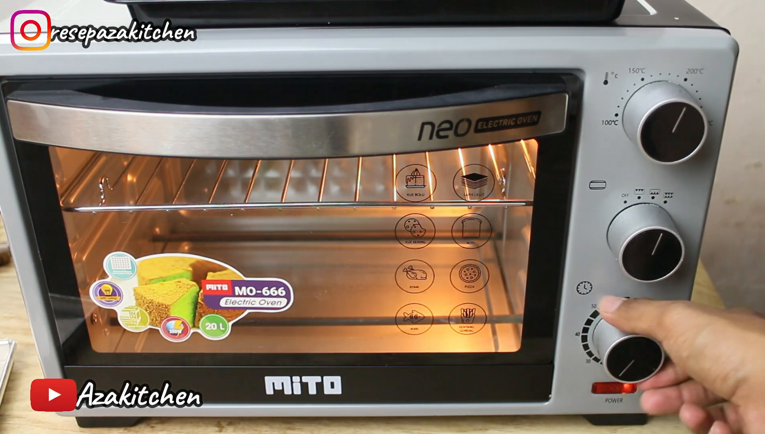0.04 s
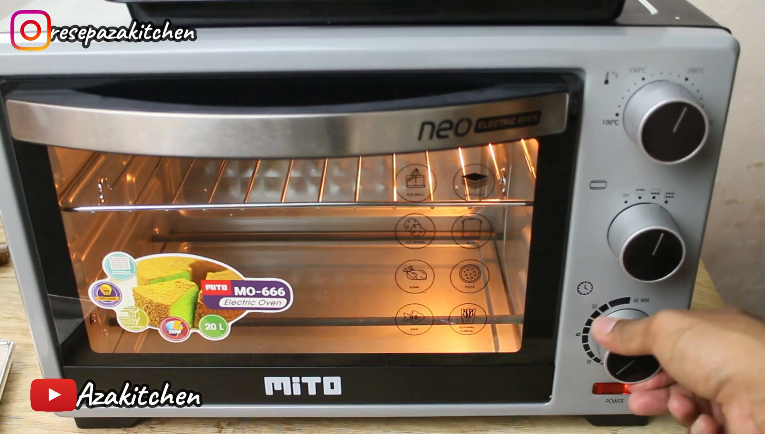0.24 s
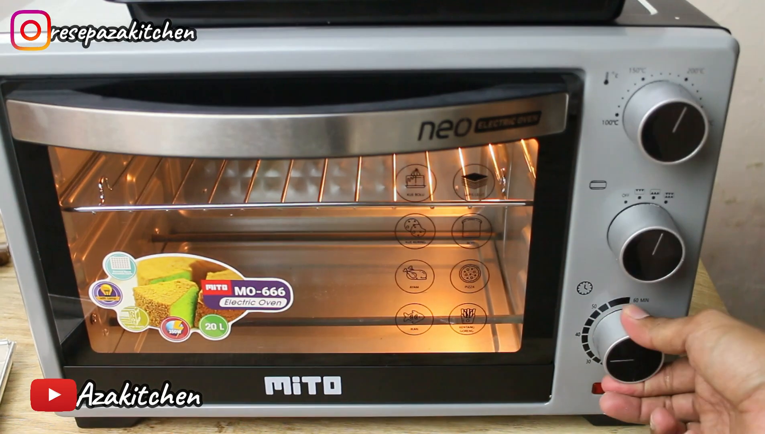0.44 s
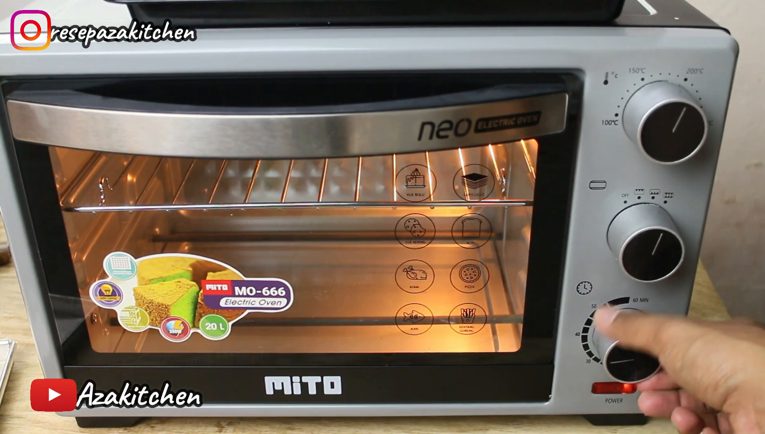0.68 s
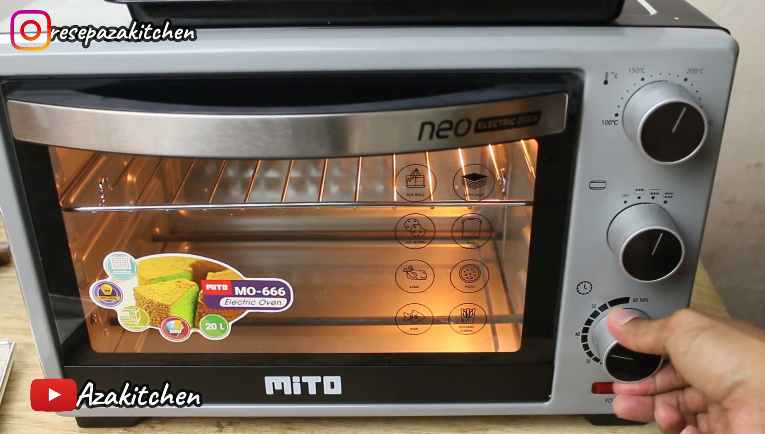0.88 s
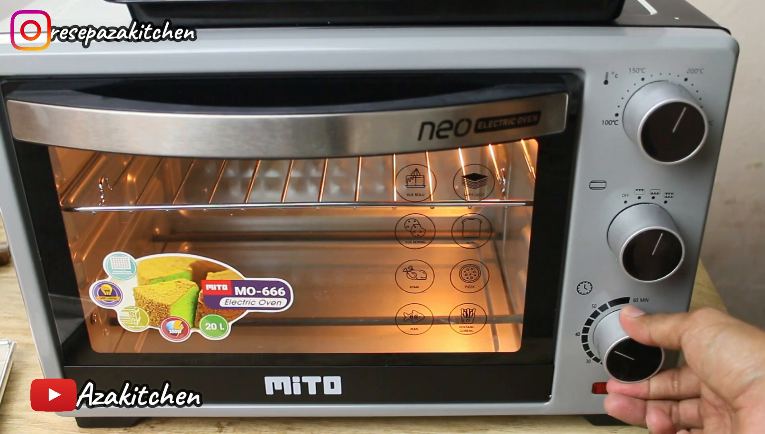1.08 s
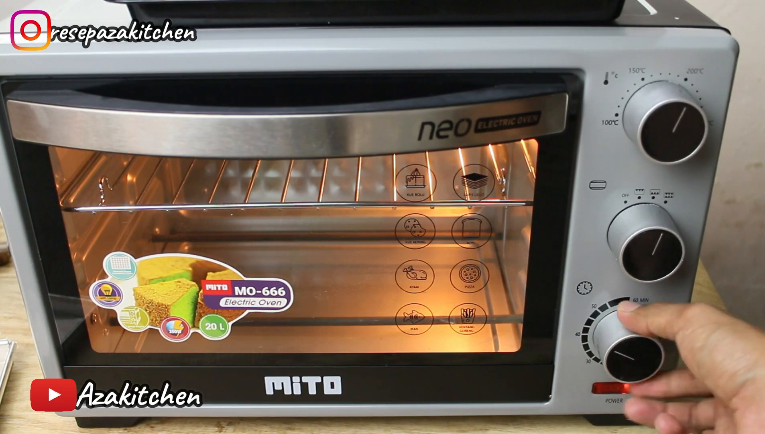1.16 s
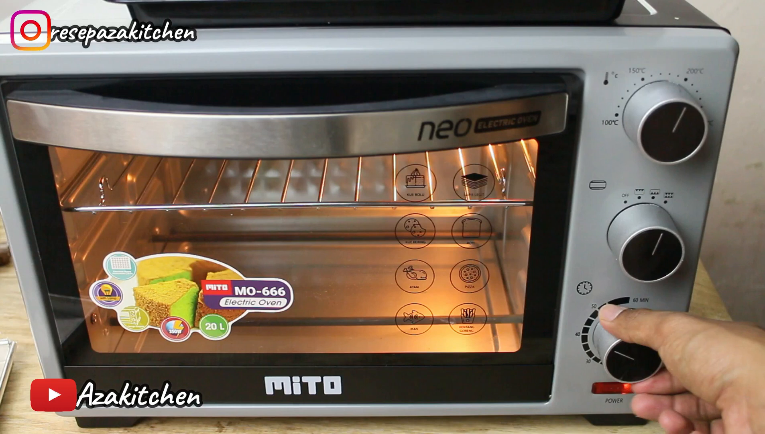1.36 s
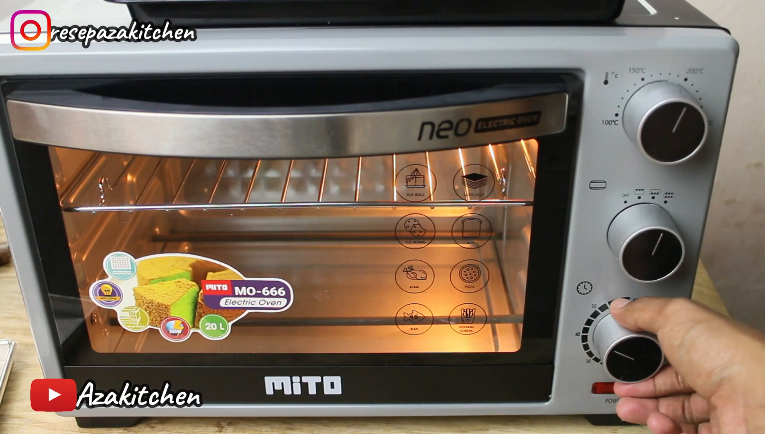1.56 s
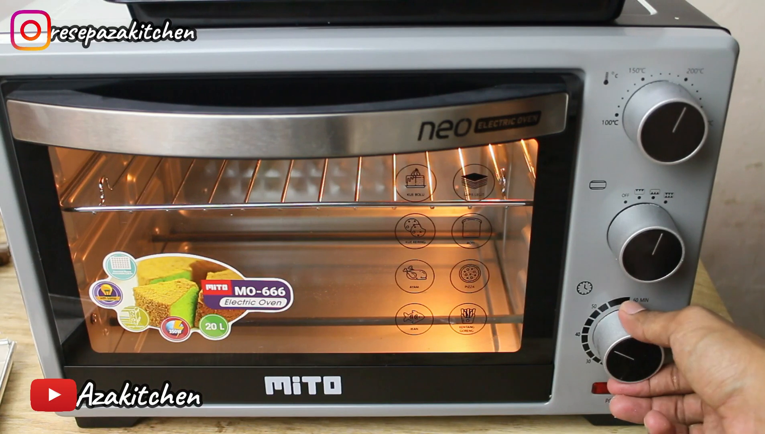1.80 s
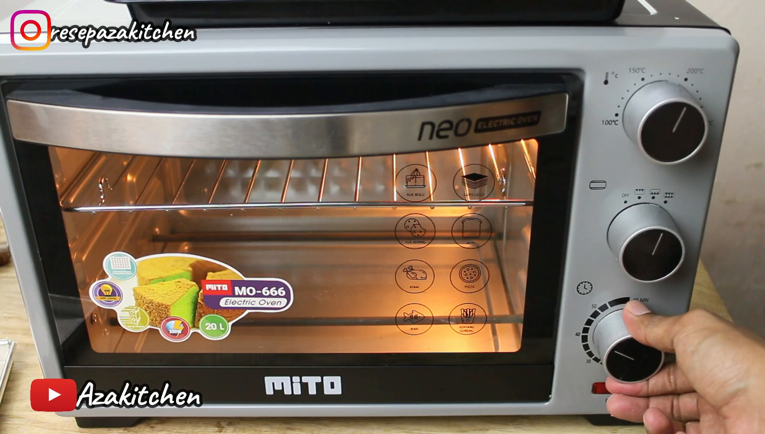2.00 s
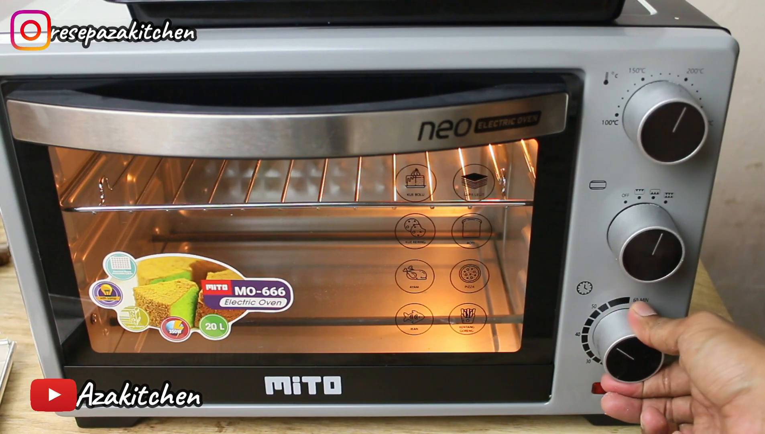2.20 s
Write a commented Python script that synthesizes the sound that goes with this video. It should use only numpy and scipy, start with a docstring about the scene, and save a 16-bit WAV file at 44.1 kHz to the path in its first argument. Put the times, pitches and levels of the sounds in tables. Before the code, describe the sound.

Mechanical timer dial winding: two rasping ratchet bursts, sharp clacks, then faint ticking in a quiet kitchen

```python
"""A hand winds the clockwork timer of a small steel oven: two long twists of the knob whirr through the
ratchet, as gear chatter with a rattle at each tooth, beside shorter scraps of whirr. The knob clacks and
the escapement ticks: single blows that ring the clockwork and the steel casing, with the kitchen's echo.
Soft bumps on the worktop are low rings; a distant engine drones in three sines. Shaped noise makes the
room's rumble, the microphone's faint hiss and a second noise, opposite in left and right."""
import sys
import numpy as np
from scipy import signal
from scipy.fft import rfft, irfft
from scipy.io import wavfile

SR = 44100
rng = np.random.default_rng(int(sys.argv[2]) if len(sys.argv) > 2 else 0)


def dump(signal):
    """Clip the signal to [-1, 1] and save it as 16-bit WAV at the path in sys.argv[1]."""
    limited = np.clip(np.atleast_2d(signal).T, -1, 1)
    pcm = np.round(limited * 32767).astype(np.int16)
    wavfile.write(sys.argv[1], SR, pcm)


N = 98828


def amp(db):
    """Decibels to gain."""
    return 10 ** (np.asarray(db) / 20)


def unit(x):
    """Scale to rms 1."""
    return x / np.sqrt(np.mean(x ** 2) + 1e-20)


def curve(rows, col=1):
    """One column of a table, joined by straight lines along time."""
    rows = np.array(rows)
    return np.interp(np.arange(N) / SR, rows[:, 0], rows[:, col])


def at_hz(points, hz):
    """Read a table over pitch on a log axis."""
    points = np.array(points)
    return np.interp(np.log(hz + 1), np.log(points[:, 0]), points[:, 1])


def colour(x, spectrum):
    """Shape a signal by a spectrum table, falling away below its first point."""
    hz = np.arange(len(x) // 2 + 1) * SR / len(x)
    low_fall = np.minimum(hz / spectrum[0][0], 1) ** 2
    return irfft(rfft(x) * amp(at_hz(spectrum, hz)) * low_fall, len(x))


def filtered(x, order, edge_hz, kind):
    """Let through only a "band" of pitches, or only those above an edge ("high")."""
    return signal.sosfilt(signal.butter(order, edge_hz, kind, fs=SR, output="sos"), x)


def drift(rate_hz):
    """Slow random wandering of rms 1."""
    r = np.exp(-2 * np.pi * rate_hz / SR)
    noise = rng.standard_normal(N + SR)
    return unit(signal.lfilter([1], [1, -2 * r, r * r], noise)[SR:])   # skip the start-up second


def peak(x, hz, width_hz):
    """A resonance with gain 1 on top."""
    r = np.exp(-np.pi * width_hz / SR)
    feedback = [1, -2 * r * np.cos(2 * np.pi * hz / SR), r * r]
    return signal.lfilter([(1 - r * r) / 2, 0, (r * r - 1) / 2], feedback, x + 1e-18)


def ring(x, hz, t60):
    """A unit click starts a dying sine, which falls 60 dB in t60 seconds."""
    r, w = amp(-60 / (t60 * SR)), 2 * np.pi * hz / SR
    return signal.lfilter([0, np.sin(w)], [1, -2 * r * np.cos(w), r * r], x + 1e-18)


# resonances of the clockwork and its panel: (pitch [Hz], width before damping [Hz], level [dB])
WORKS_MODES = [(1231, 29, -6.5), (1819, 78, 7), (2094, 120, -2), (2380, 134, 0), (2972, 130, -7.5),
               (3177, 10.3, -1.5), (3867, 430, -8), (4437, 52, 1.5), (4793, 92, -6), (5800, 80, -2),
               (5920, 150, -15.5), (6170, 330, -7.5), (6810, 17, -5), (7510, 26, -4), (8420, 120, -5),
               (9680, 640, -9.5), (11010, 110, -15.5), (12700, 46, -58), (13000, 30, -68),
               (14300, 100, -31)]
# broad colour under them: (pitch [Hz], level [dB])
WORKS_BED_COLOUR = [(180, -66), (300, -19), (425, -7), (725, -1.5), (1320, 8.5), (2840, -10), (3890, -3),
                    (7690, -10.5), (8360, -15.5), (16000, -22)]
NARROWEST_HZ = 80   # the panel damps every resonance to at least this width


def works(x, bed_db):
    """Contacts ring the clockwork's resonances, with alternating signs, over a broad bed."""
    rings = 0
    for k, (hz, width_hz, db) in enumerate(WORKS_MODES):
        rings = rings + (-1) ** k * amp(db) * peak(x, hz, max(width_hz, NARROWEST_HZ))
    return rings + amp(bed_db) * colour(x, WORKS_BED_COLOUR)


# ringing tones of the casing: (pitch [Hz], level [dB], time to fall 60 dB [s])
CASING_MODES = [(166, -16.5, 0.12), (292.3, -13, .1), (423.4, -10.5, 0.18), (503, -9.5, 0.059),
                (545, -10.5, 0.12), (623, -8.5, 0.056), (725, -15, 0.061), (900, 0.5, 0.018)]
THUD_CUT_HZ = 1110


def casing(x):
    """The sheet-steel box booms in a few low modes."""
    soft = filtered(x, 2, [130, THUD_CUT_HZ], "band")
    return sum(amp(db) * ring(soft, hz, t60) for hz, db, t60 in CASING_MODES)


# stretches of whirr from the turning knob, each a list of: (time [s], level [dB])
KNOB_TWISTS = [
    [(0.0, -43.5), (0.024, -60.5), (0.026, -61)],
    [(0.305, -59), (0.331, -39.5), (0.437, -39.5), (0.519, -40.5), (0.58, -66)],
    [(0.895, -57), (0.907, -40.5), (0.923, -40), (1.025, -39.5), (1.089, -42.5), (1.135, -68)],
    [(1.36, -93), (1.376, -64), (1.41, -68)],
    [(2.225, -66), (2.233, -71), (2.24, -40)],
]
GRIT_PER_S, GRIT_SPREAD_DB = 7000, 2.5   # gear chatter between the teeth
TEETH_PER_S, TOOTH_JITTER, TOOTH_SPREAD_DB = 124, 0.1, 3   # jitter is a share of the tooth spacing
TOOTH_DB, TOOTH_S = 7.5, 0.0014   # rattle after each tooth: level and decay time
TOOTH_ZING_DB, ZING_HZ = 9.5, 5800   # extra bright part of that rattle, above this pitch
WHIRR_BED_DB, WHIRR_LOW_HZ, CASING_WHIRR_DB = -5, 930, -36.5


def whirr():
    """Gear chatter with a short bright rattle at each ratchet tooth, as strong as the twist."""
    sizes = amp(GRIT_SPREAD_DB * np.minimum(rng.exponential(1, N), 4))
    grit = (rng.random(N) < GRIT_PER_S / SR) * sizes
    grit = unit(grit * rng.choice([-1, 1], N))

    teeth = np.cumsum(1 + TOOTH_JITTER * rng.standard_normal(400)) * SR / TEETH_PER_S
    at = teeth[teeth < N].astype(int)
    drops = np.zeros(N)
    drops[at] = amp(TOOTH_SPREAD_DB * rng.standard_normal(400))[:len(at)]
    fading = signal.lfilter([1], [1, -np.exp(-1 / (TOOTH_S * SR))], drops)
    rattle = fading * rng.standard_normal(N)
    zing = filtered(rattle, 2, ZING_HZ, "high")
    chatter = unit(grit + amp(TOOTH_DB) * rattle + amp(TOOTH_ZING_DB) * zing)

    t, force = np.arange(N) / SR, 0
    for rows in KNOB_TWISTS:
        turning = (t >= rows[0][0]) * (t <= rows[-1][0])
        force = force + amp(curve(rows)) * turning
    scale = 1 / np.std(works(chatter, WHIRR_BED_DB))
    gears = filtered(works(force * chatter, WHIRR_BED_DB), 4, WHIRR_LOW_HZ, "high")
    return scale * gears + amp(CASING_WHIRR_DB) * casing(force * chatter)


# time to fall 60 dB in the room: (pitch [Hz], time [s])
ROOM_FALL = [(200, 0.83), (1000, 0.34), (4000, 0.25), (8000, 0.18), (14000, 0.14)]
ROOM_DB, ROOM_GAP_S = -3.5, 0.0026   # the echo starts after this gap


def room(x):
    """A diffuse echo, built from bands of noise, that dies faster in the treble."""
    t, tail = np.arange(SR // 2) / SR, 0
    edges = 100 * 2 ** np.arange(0, 7.6, .75)
    for low, high in zip(edges, edges[1:]):
        band = filtered(rng.standard_normal(len(t)), 2, [low, high], "band")
        tail = tail + band * amp(-60 * t / at_hz(ROOM_FALL, np.sqrt(low * high)))
    tail = tail * (t > ROOM_GAP_S)
    return amp(ROOM_DB) * signal.fftconvolve(tail / np.sqrt(np.sum(tail ** 2)), x)[:N]


# distant engine: (time [s], firing rate [Hz], first, second and third order level before wavering [dB])
ENGINE = [(0, 100.8, -61, -63, -74), (.3, 105.3, -61, -63.5, -70), (.53, 107.4, -70, -55.5, -75),
          (.65, 109, -72, -61, -66), (.87, 109.4, -63, -67, -66), (1.05, 110.9, -56.5, -62, -58.5),
          (1.2, 109.9, -60.5, -65, -65), (1.35, 109.7, -70, -66, -76), (1.5, 109.8, -82, -75, -88)]
DRONE_WAVER_DB = 1.5


def drone():
    """Three engine orders: sines at one, two and three times the firing rate, slightly wavering."""
    phase = 2 * np.pi * np.cumsum(curve(ENGINE)) / SR
    total = 0
    for order in range(1, 4):
        level_db = curve(ENGINE, col=order + 1) + DRONE_WAVER_DB * drift(8)
        total = total + amp(level_db) * np.sin(order * phase)
    return total


# the room's rumble before wavering: (time [s], level [dB])
RUMBLE_LEVEL = [(0.0, -48.5), (0.23, -58.5), (0.81, -58.5), (1.1, -59), (1.52, -60.5), (2.1, -62.5),
                (2.24, -65)]
# its colour: (pitch [Hz], level [dB])
RUMBLE_SPECTRUM = [(12, 2), (20, -8), (43, -6.5), (113, -9.5), (143, -2.5), (188, -3), (354, -16),
                   (464, -14), (536, -15), (690, -19.5), (1500, -30), (1950, -54), (3300, -120)]


def rumble():
    """Low noise whose level follows the table and wavers by about half a decibel."""
    level = amp(curve(RUMBLE_LEVEL) + 0.5 * drift(3.3))
    return level * unit(colour(rng.standard_normal(N), RUMBLE_SPECTRUM))


# colour of the microphone's hiss: (pitch [Hz], level [dB])
HISS_SPECTRUM = [(350, -3), (600, -25.5), (881, -19), (997, -1), (1450, -2.5), (2210, -5.5), (9620, -8.5),
                 (16000, -11.5)]


def hiss():
    """Steady noise of the microphone, the same left and right."""
    return amp(-65) * unit(colour(rng.standard_normal(N), HISS_SPECTRUM))


# colour of the noise that differs at the two microphone ports: (pitch [Hz], level [dB])
PORT_SPECTRUM = [(12, -21), (20, 3), (98, -1), (158, -24), (198, 2), (241, -8), (4810, -13), (14700, -15.5),
                 (16000, -25)]


def port_noise():
    """Steady noise that pushes one port up while it pulls the other down."""
    noise = amp(-66) * unit(colour(rng.standard_normal(N), PORT_SPECTRUM))
    return noise * [[1], [-1]]


SCATTER = 0.76   # all-pass feedback


def scatter(click, spread_s):
    """Loose parts smear one contact over a few milliseconds: a chain of short all-pass delays."""
    for lag in 1 + (spread_s * SR * rng.uniform(.02, .2, 5)).astype(int):
        b = np.zeros(lag + 1)
        b[[0, -1]] = -SCATTER, 1
        click = signal.lfilter(b, b[::-1], click + 1e-18)
    return click


# blows in the clockwork, all levels relative: (time [s], level [dB], snap pitch [Hz], snap level [dB],
# casing thud level [dB], rattle spread [s], then seven strike levels [dB], one for each strike pitch)
CLOCKWORK_BLOWS = [(0.0318, -14.5, 7600, 5, 2, 0.0035, -14.5, -22, -17, -19.5, -20, -18, -12.5),
                   (0.2359, -42.5, 6550, 1.5, -3, 0.0048, -17, -18, -18, -14.5, -14, -11, -10),
                   (0.2444, -46, 6550, -8, 18, 0.0062, -14, -17.5, -16, -21, -16, -16, -21),
                   (0.2992, -48.5, 7900, -11, -7, 0.0038, -26, -11, -17, -4, -9, -20, -19),
                   (0.594, -23.5, 6360, 2.5, 1.5, 0.0032, -15, -19, -20.5, -14.5, -15.5, -9, -15),
                   (0.7138, -39, 7700, -12, 9, 0.0038, -13, -14.5, -15.5, -25, -13, -15, -11),
                   (0.7286, -41, 6340, -1, 5.5, 0.003, -33, -21, -29, -15.5, -11.5, -14, -18),
                   (0.7358, -57, 6300, -6, -4, 0.0052, -24, -14, -21, -26, -20, -16, -24),
                   (0.8804, -45.5, 6570, -3, 7, 0.0046, -30, -12, -24, -13, -10, -9, 0),
                   (1.1444, -27.5, 8500, -16, 6.5, 0.0035, -27, -12, -19.5, -11.5, -18, -13, -2),
                   (1.1523, -23.5, 7940, -2, 7.5, 0.004, -22, -18.5, -24.5, -18.5, -14, -9.5, -15),
                   (1.4197, -39.5, 7000, 0.5, 0, 0.0032, -29, -21.5, -9.5, -12.5, -9.5, -8.5, -14),
                   (1.6681, -42, 6540, -2, -5, 0.004, -25, -25, -11, -21, -9.5, -10.5, -18),
                   (1.8961, -40, 7650, -1, -2, 0.0039, -28, -17, -12.5, -13.5, -14, -10, -21),
                   (2.1989, -31.5, 8540, -10, -3, 0.0032, -23, -19.5, -14, -16.5, -10, -14.5, -5)]
# the strike pitches [Hz]
STRIKE_PITCHES = [700, 1300, 2000, 3000, 4400, 7500, 13000]
SNAP_WIDTH_HZ, THUD_S = 520, 0.014   # the thud's push is strongest after THUD_S
BLOW_DB, BODY_DB, BLOW_BED_DB, CASING_DB = 9, 26, -6, -53.5
LEAD_S = 0.01   # quiet lead-in: the colouring also spreads a click backwards


def blows():
    """Each blow is a scattered contact ringing the works, a bright snap and a slower casing thud."""
    out = np.zeros(N + SR)
    t = np.maximum(np.arange(SR // 4) / SR - LEAD_S, 0)
    click = np.diff(t > 0, prepend=False) * 1.
    for s, db, snap_hz, snap_db, thud_db, rattle_s, *strike_db in CLOCKWORK_BLOWS:
        jolt = scatter(click, rattle_s)
        snap = peak(peak(jolt, snap_hz, SNAP_WIDTH_HZ), snap_hz, 2 * SNAP_WIDTH_HZ)
        body = works(colour(jolt, list(zip(STRIKE_PITCHES, strike_db))), BLOW_BED_DB)
        push = rng.standard_normal(len(t)) * t / THUD_S * np.exp(-t / THUD_S)
        thud = amp(CASING_DB + thud_db) * casing(push)
        blow = amp(BODY_DB) * body + 3 * amp(snap_db) * snap + thud
        i = int((s - LEAD_S) * SR)
        out[i:i + len(t)] += amp(db + BLOW_DB) * blow
    return out[:N]


# soft bumps of the hand on the worktop: (time [s], level before filtering [dB], pitch [Hz])
HAND_BUMPS = [(0.046, -38, 170), (0.702, -41.5, 180), (1.21, -52, 173), (1.709, -46.5, 200),
              (2.047, -48, 110)]
BUMP_T60_S = 0.083   # time to fall 60 dB


def bumps():
    """Dull knocks: one click starts a short low ring, then a filter softens it."""
    out = np.zeros(N)
    for s, db, hz in HAND_BUMPS:
        push = np.zeros(N)
        push[int(s * SR)] = amp(db)
        out += ring(push, hz, BUMP_T60_S)
    return filtered(out, 2, [70, 400], "band")


def scene():
    """The timer and its echo, with bumps and engine, over rumble and hiss."""
    timer = whirr() + blows()
    return timer + room(timer) + drone() + rumble() + hiss() + port_noise() + bumps()


def record(dry):
    """The top is cut steeply at 15950 Hz."""
    return signal.sosfilt(signal.cheby2(30, 60, 15950, fs=SR, output="sos"), dry)


dry = scene()
out = record(dry)
dump(out)
```